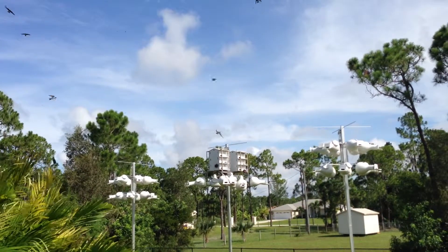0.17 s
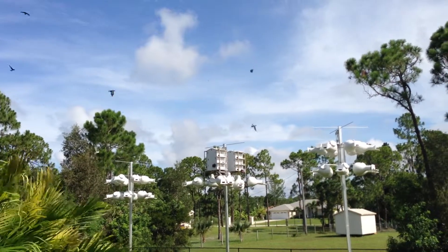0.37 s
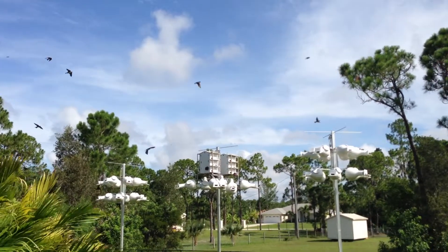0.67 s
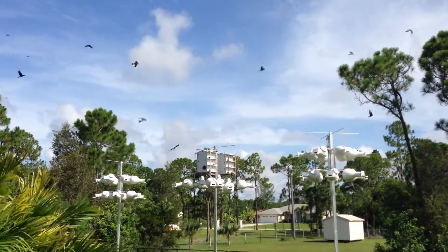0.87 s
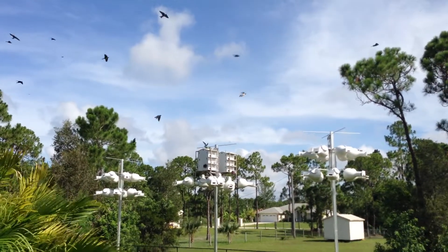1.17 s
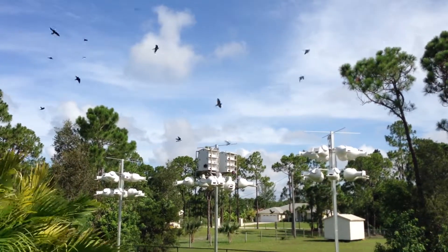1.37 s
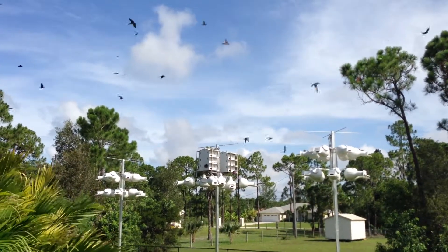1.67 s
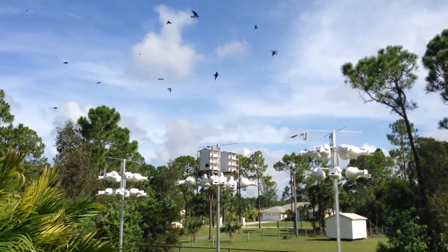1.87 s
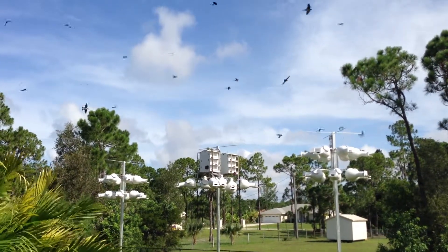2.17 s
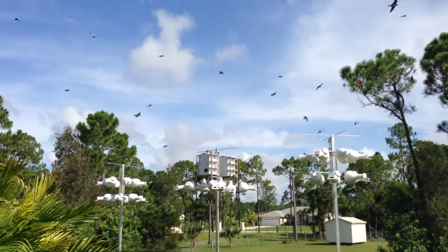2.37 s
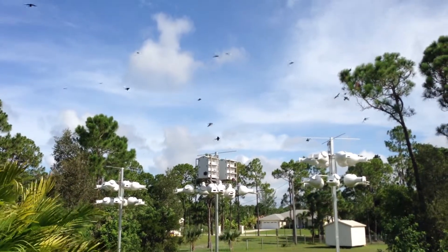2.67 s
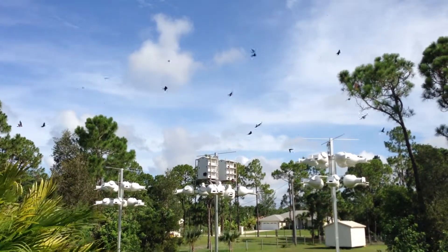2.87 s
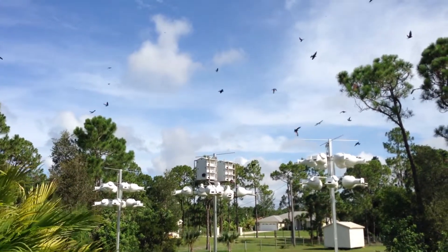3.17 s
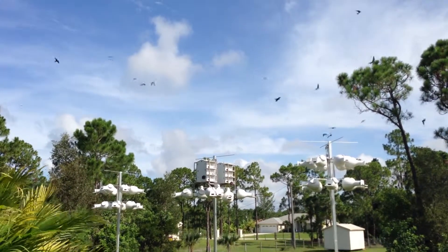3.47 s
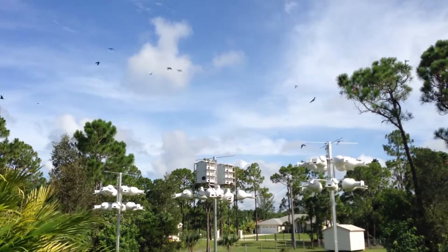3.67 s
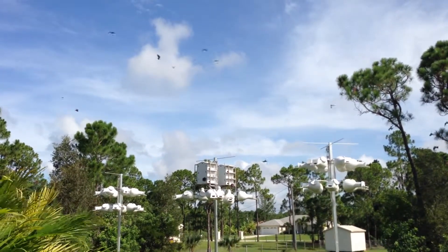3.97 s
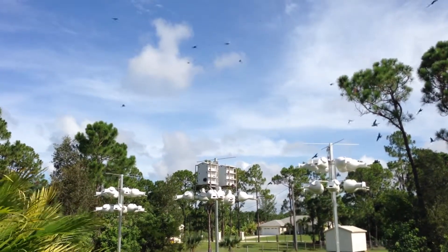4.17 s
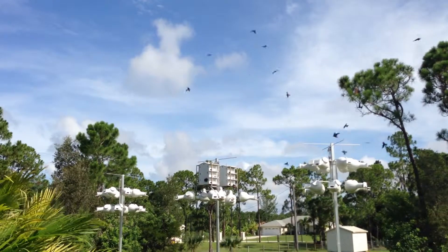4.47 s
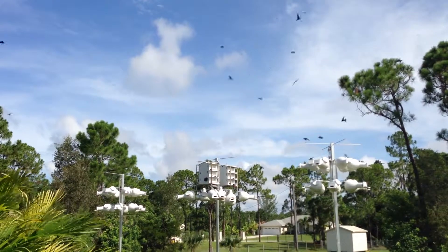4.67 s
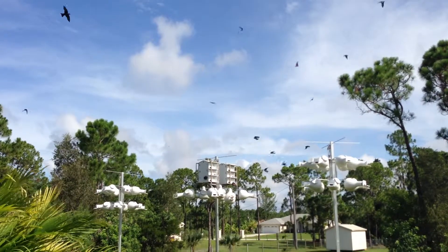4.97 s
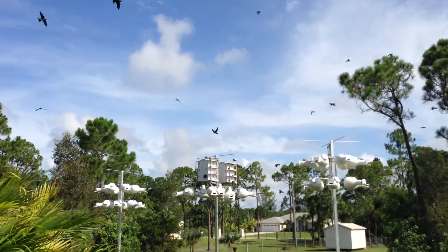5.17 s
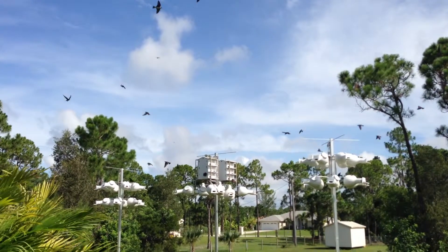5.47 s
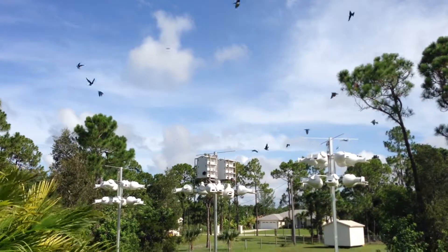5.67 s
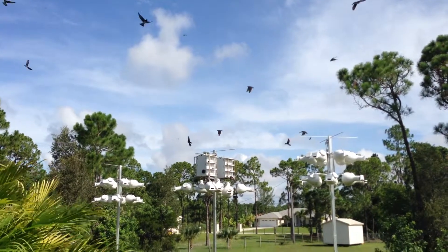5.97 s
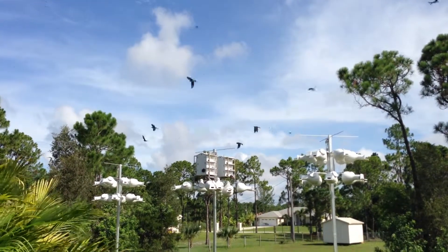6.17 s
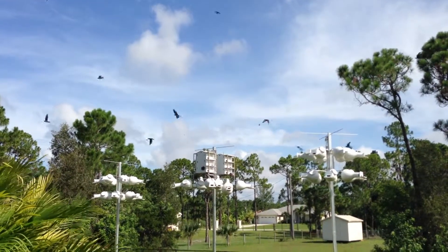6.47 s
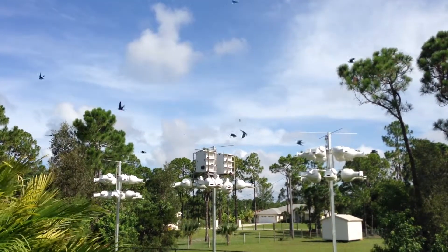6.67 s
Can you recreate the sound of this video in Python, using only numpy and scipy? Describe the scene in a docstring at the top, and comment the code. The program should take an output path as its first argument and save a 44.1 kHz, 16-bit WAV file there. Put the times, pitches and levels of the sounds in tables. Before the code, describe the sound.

Many small birds whistle and chatter outdoors with light echo, cicadas ringing thinly behind, wind thumping the microphone early, and a sudden raspy shriek.

```python
"""A colony of purple martins wheels over the nest houses in a backyard ringed by trees.
From the start their buzzy falling whistles overlap and echo, over shrill cicadas, steady hiss and a far drone.
Wind puffs (filtered noise) buffet the microphone hardest just after one second; quick sliding notes begin.
The cicadas, made of ringing harmonics, crest near two seconds and fade; then one bird gives a rough screech.
Chirps and slides go on, held notes come more often, and from four seconds there are bursts of tiny notes."""
import sys
import numpy as np
from scipy import signal
from scipy.fft import rfft, irfft, next_fast_len
from scipy.io import wavfile
from scipy.ndimage import uniform_filter1d, map_coordinates

SR = 44100
rng = np.random.default_rng(int(sys.argv[2]) if len(sys.argv) > 2 else 0)


def materialize(psi):
    """Save the field psi as 16-bit PCM at rate SR to the path in sys.argv[1].

    A 1-D psi becomes a single channel; in a 2-D psi each row is a channel.
    """
    bounded = np.clip(np.atleast_2d(psi).T, -1, 1)
    quanta = np.round(bounded * 32767).astype(np.int16)
    wavfile.write(sys.argv[1], SR, quanta)


N = 300762
TIME = np.arange(N) / SR
SWING_HZ = 220  # usual pitch swing of a chirp's buzz


def gain_of(db):
    """Turns decibels into amplitude."""
    return 10 ** (np.asarray(db) / 20)


def evened(x):
    """Scales a sound to an rms of 1."""
    return x / np.sqrt(np.mean(abs(x) ** 2) + 1e-20)


def read(points, hz):
    """Reads a curve of (Hz, value) points along log frequency."""
    f, value = np.transpose(points)
    return np.interp(np.log(hz + 1), np.log(f + 1), value)


def level_at(points, t):
    """Reads a curve of (seconds, value) points at the times t."""
    return np.interp(t, *np.transpose(points))


def add(mix, s, sound):
    """Mixes a sound in at time s, in seconds."""
    part = mix[max(round(s * SR), 0):][:len(sound)]
    part += sound[:len(part)]


def noise(colour):
    """Makes noise of rms 1 by shaping the spectrum of random samples."""
    size = next_fast_len(N)
    hz = np.fft.rfftfreq(size, 1 / SR)
    spectrum = rfft(rng.standard_normal(size)) * gain_of(read(colour, hz))
    return evened(irfft(spectrum, size)[:N])


def wander(rate, size):
    """Drifts smoothly between random values, with about rate new values a second."""
    knots = rng.standard_normal(4096)
    return map_coordinates(knots, [np.arange(size) * rate / SR], order=3, mode="wrap")


def fade(t, rise, fall):
    """Gives a note a soft start and end; rise and fall are in seconds."""
    start = np.sin(np.pi / 2 * np.clip(t / rise, 0, 1)) ** 2
    end = np.sin(np.pi / 2 * np.clip((t[-1] - t) / fall, 0, 1)) ** 2
    return start * end


def air():
    """Even outdoor hiss, plus a slowly swelling low drone like far road traffic."""
    # Spectrum of the hiss. Each row: frequency in Hz, relative level in dB per Hz.
    hiss_colour = [(15, -86), (400, -31), (1000, 0), (1800, -4.5), (3000, 5.5), (4500, -1), (7000, -6),
                   (10000, -10.5), (15300, -12.5)]
    # Spectrum of the drone. Each row: frequency in Hz, relative level in dB per Hz.
    drone_colour = [(15, -50), (25, -9), (60, -11), (100, 3.5), (170, -6), (350, 0), (550, -4.5), (900, -9),
                    (1400, -21), (2500, -33)]
    # Loudness of the drone over time. Each row: time in seconds, level in dB.
    drone_swell = [(0, -63), (1.8, -61.5), (2.4, -58), (3.2, -58.5), (3.8, -63), (4.4, -61.5), (5, -61),
                   (5.6, -59), (6.2, -58.5), (6.8, -60)]
    hiss = gain_of(-62.5) * noise(hiss_colour)
    drone = gain_of(level_at(drone_swell, TIME)) * noise(drone_colour)
    return hiss + drone


def wind(wake_db=-16, wake_s=0.024, bright_db=-30, dull_hz=330, lumpiness=0.74):
    """Weak eddies come at random with the breeze; each puff is a short low burst with a wake; strong ones reach higher."""
    # The breeze that carries the weak eddies. Each row: time in seconds, level in dB before the random spread.
    breeze = [(0, -48), (.55, -51.5), (.85, -53.5), (1.3, -53), (1.75, -69), (2.2, -63), (2.45, -56.5),
              (2.8, -63.5), (3.15, -64), (3.35, -81), (3.6, -59), (3.85, -81), (6.8, -78)]
    # The stronger puffs on the microphone. Each row: centre in seconds, level in dB, length in seconds.
    puffs = [(0.021, -33, 0.022), (0.16, -34.5, 0.063), (0.364, -41, 0.044), (.488, -44, 0.0075),
             (0.608, -39, 0.013), (.722, -34.5, 0.017), (.757, -40, 0.013), (0.898, -38, 0.0092),
             (0.962, -36, 0.0065), (1.101, -28, 0.013), (1.14, -31, 0.018), (1.173, -25, 0.014),
             (1.242, -31.5, 0.046), (1.355, -41.5, .012), (1.519, -45, .008), (1.655, -48.5, .018),
             (2.441, -43, 0.012), (2.63, -38.5, 0.046), (2.933, -46, 0.011), (2.983, -42.5, .03),
             (3.128, -44.5, 0.012), (3.574, -48.5, 0.041), (3.653, -40, 0.012), (3.683, -43.5, 0.0084),
             (4.941, -49, .013), (5.107, -40.5, .012), (5.138, -38, 0.012), (5.583, -40, 0.0077),
             (5.843, -45.5, 0.014)]
    # Spectrum of the turbulence. Each row: frequency in Hz, relative level in dB per Hz.
    swirl_colour = [(30, -23), (80, -38), (128, -5), (190, 0), (260, -2.5), (420, -7), (700, -18),
                    (1000, -35.5), (1400, -51), (2500, -100)]
    eddies_per_s, eddy_spread_db = 70, 5.5
    eddy_db = eddy_spread_db * np.minimum(wander(eddies_per_s, N), 1.5)
    power = gain_of(level_at(breeze, TIME) + eddy_db) ** 2
    for s, db, length in puffs:
        near = slice(max(int((s - .2) * SR), 0), int((s + .2) * SR))
        age = TIME[near] - s
        burst = np.exp(-np.pi * (age / length) ** 2)
        wake = gain_of(wake_db) ** 2 * np.exp(-(age / wake_s) ** 2)  # weaker, on both sides of the burst
        power[near] += gain_of(db) ** 2 * (burst + wake)
    force = np.sqrt(power)
    # the force of the eddy sets the loudness, so the swirl itself is kept fairly even
    swirl = noise(swirl_colour)
    swirl_power = uniform_filter1d(swirl ** 2, size=500) + 1e-3
    swirl = evened(swirl / swirl_power ** ((1 - np.clip(lumpiness, 0, 1)) / 2))
    low_pass = signal.butter(2, dull_hz, fs=SR, output="sos")
    dull = evened(signal.sosfiltfilt(low_pass, swirl))
    bright = force / (force + gain_of(bright_db) / 2)  # share of the full spectrum, 0 to 1
    return force * (bright * swirl + (1 - bright) * dull)


def insects(hiss_db=-63):
    """The cicadas' tymbals click so evenly that their bodies ring in thin high harmonics; farther ones blur to a hiss."""
    # Spectrum of the farther cicadas. Each row: frequency in Hz, relative level in dB per Hz.
    hiss_colour = [(4000, -12.5), (4900, -2), (5500, -7), (6300, -7), (7200, -5), (8000, -10.5),
                   (9000, -21.5)]
    # How their hiss swells. Each row: time in seconds, change in dB from hiss_db.
    hiss_swell = [(0, -1), (2, 0.5), (3.8, -9), (4.8, -25), (6.8, -18)]
    # Two distant cicadas, one curve each. Each row: time in seconds, tymbal pulses a second.
    pulse_rates = [
        [(0, 240.7), (2, 241.5), (4.2, 242.8), (6.8, 243)],
        [(.9, 238.7), (1.3, 238), (2.2, 235)],
    ]
    # Loudness of each of the two. Each row: time in seconds, level in dB added to that of every harmonic.
    cicada_swells = [
        [(0, -70.5), (1.2, -66), (2, -62.5), (3.2, -68), (4, -68.5), (4.5, -77), (6.8, -74.5)],
        [(0, -69.5), (.9, -71), (1.3, -67.5), (1.7, -80.5), (2.2, -105)],
    ]
    # How each body rings, one list each: relative level in dB of its harmonics, from the 20th up.
    body_rings = [
        [-5, -7, -7, -2, -8.5, -8, -22, -1, -20, -1, -7, -25, -8.5, -11],
        [-6.5, -1, -22, 4.5, -5, -2, -14, -7, -5, -8, -2, -8, -6, -7, -5],
    ]
    out = gain_of(hiss_db + level_at(hiss_swell, TIME)) * noise(hiss_colour)
    for rates, swell, body in zip(pulse_rates, cicada_swells, body_rings):
        pulses_per_s = level_at(rates, TIME) + 0.082 * wander(9, N)
        phase = 2 * np.pi * np.cumsum(pulses_per_s) / SR
        ring = np.zeros(N)
        for k, line_db in enumerate(body, 20):
            loudness = gain_of(line_db + 1.9 * wander(3.03, N))
            ring += loudness * np.sin(k * phase + 2 * np.pi * rng.random())
        out += gain_of(level_at(swell, TIME)) * ring
    return out


def syrinx(hz, second_db, third_db):
    """The bird's voice organ: a near-sine whistle with two overtones."""
    phase = 2 * np.pi * np.cumsum(hz) / SR
    second = gain_of(second_db) * np.sin(2 * phase)
    third = gain_of(third_db) * np.sin(3 * phase)
    return np.sqrt(2) * (np.sin(phase) + second + third)


def rest_pitch(start_hz):
    """The pitch in Hz a falling chirp sinks to, a little higher after a high start."""
    rest_hz, usual_start_hz, rest_follow = 2407, 3718, 0.3606
    return rest_hz * (start_hz / usual_start_hz) ** rest_follow


def chirp(length, start_hz, end_hz, bend, level_db, swell_db, swing_hz, buzz_hz=143, throb=0.27,
          jitter_hz=50, swing_growth=0.21, rise_follow=.45):
    """A falling whistle; a fast flutter of the syrinx shakes both its pitch and its loudness."""
    t = np.arange(max(int(length * SR), 64)) / SR
    u = t / t[-1]  # 0 at the start of the note, 1 at its end
    glide = start_hz * (end_hz / start_hz) ** (u ** bend)
    pace = rng.uniform(.87, 1.13) * (1 + .1 * wander(70, len(t)))
    flutter = 2 * np.pi * (np.cumsum(buzz_hz * pace) / SR + rng.random())
    swing = swing_hz * (1 + swing_growth * (u - .5)) * np.sin(flutter)
    hz = glide + swing + jitter_hz * wander(505.2, len(t))
    arch_db = 4 * (2 * u - 1) ** 2  # a chirp is fullest in its middle
    db = level_db + swell_db * (u - .5) - arch_db
    rise = np.interp(db[0], [-50, -40], [.024, .011]) * bend ** rise_follow  # soft and late-diving chirps swell in
    db = db + 1.42 * wander(50.0, len(t))  # the bird turns and beats its wings
    loudness = gain_of(db) * (1 + throb * np.cos(flutter)) * fade(t, rise, fall=0.021)
    return loudness * syrinx(hz, second_db=-29.5, third_db=-37.5)


def far_martins(level_db=-66, usual_hz=3800, count=60):
    """The rest of the colony, chirping at random far away and merging into a soft babble."""
    out = np.zeros(N)
    for k, (delay, size, loud) in enumerate(rng.random((count, 3)) - .5):
        hz = usual_hz * (1 + 0.15 * size)
        s = (k + 2 * delay) / count * N / SR
        add(out, s, chirp(0.17, hz, rest_pitch(hz), 1, level_db + 5 * loud, 0, SWING_HZ))
    return out


def rattles(ticks_per_s=230, tick_s=0.00944, low_hz=2450, high_hz=5000, drop=0.251, spread_db=14):
    """Scratchy chatter: a quick scatter of tiny falling whistles at random pitches."""
    # Each row: start in seconds, length in seconds, middle level in dB of one tick.
    chatter_bursts = [(4.124, 0.14, -59.5), (4.95, 0.06, -54.5), (5.31, 0.11, -57), (5.711, 0.07, -51.5),
                      (5.783, 0.064, -59)]
    out = np.zeros(N)
    t = np.arange(int(tick_s * SR)) / SR
    for s, length, db in chatter_bursts:
        count = max(int(length * ticks_per_s), 1)
        for k, (late, height, loud) in enumerate(rng.random((count, 3))):
            hz = low_hz * (high_hz / low_hz) ** height * np.exp(-drop * t / tick_s)
            tick = np.hanning(len(t)) * syrinx(hz, second_db=-14.5, third_db=-23.5)
            add(out, s + (k + late) / count * length, gain_of(db + spread_db * (loud - .5)) * tick)
    return out


def slurs(end_hz=1824):
    """Clean whistles that all slide down to about the same low pitch in a few hundredths of a second."""
    # Each row: start in seconds, length in seconds, start pitch in Hz, level in dB,
    # octave overtone in dB relative to the root.
    slur_notes = [(0.852, 0.05, 4240, -50.5, -14), (.92, 0.034, 2450, -57, -7),
                  (1.255, .05, 3050, -55.5, -0.5), (2.959, .052, 2700, -56.5, -14),
                  (3.016, .06, 2230, -65, -17), (4.081, 0.067, 4200, -55.5, -6.5),
                  (4.177, .03, 4100, -52.5, -22), (4.201, .034, 2890, -54.5, -25),
                  (4.237, 0.033, 2400, -60, -20), (4.928, 0.033, 3030, -54, 3), (4.956, .05, 2950, -57, -5),
                  (5.288, 0.066, 2990, -55, -7), (5.336, .058, 3600, -54, -18), (5.488, .07, 2650, -63, -3),
                  (5.732, 0.045, 3730, -52.5, -6), (5.79, 0.028, 2350, -60, 0),
                  (5.83, 0.036, 2770, -65, -4)]
    out = np.zeros(N)
    for s, length, start_hz, db, octave_db in slur_notes:
        t = np.arange(int(length * SR)) / SR
        glide = start_hz * (end_hz / start_hz) ** ((t / t[-1]) ** .85)
        hz = glide * (1 + 0.0081 * wander(170.0, len(t)))
        loudness = gain_of(db) * fade(t, rise=0.0058, fall=0.02)
        add(out, s, loudness * syrinx(hz, octave_db, octave_db - 12.5))
    return out


def screech(rasp_hz=650, overtone_rasp_hz=430, third_db=-13, hiss_db=-20):
    """A loud high whistle that dives and breaks into a rasp; its overtones are rougher than its root."""
    # The screech and a low note under its end, one curve a note. Each row: time in seconds, pitch in Hz,
    # level in dB, roughness from 0 to 1, octave overtone in dB relative to the root.
    screech_notes = [
        [(2.657, 2670, -39.5, 0.4, -9), (2.668, 3470, -39.5, 0.3, -9), (2.684, 3780, -38, 0.3, -8)],
        [(2.676, 5350, -42, 0, -22), (2.694, 5540, -32, 0.03, -21), (2.711, 5040, -34.5, 0.2, -15.5),
         (2.725, 4200, -30, 0.35, -17.5), (2.74, 3740, -30, 0.39, -18.5), (2.758, 3560, -39, 0.32, -10.5),
         (2.787, 4290, -43, 0.84, -15), (2.812, 4120, -58, 0.47, 0.5), (2.835, 3430, -43.5, 0.32, 6)],
        [(2.828, 4950, -35, 0.55, -26), (2.86, 5000, -47, 0.53, -28), (2.92, 5120, -66, 0, -22)],
        [(2.74, 2755, -61, 0.18, -26), (2.805, 2706, -43.5, 0.19, -26), (2.84, 2490, -54, 0.3, -26)],
    ]
    out = np.zeros(N)
    hiss = noise([(1500, -47), (2300, -1), (5200, 0), (6100, -10), (8000, -6), (12000, -15), (15000, -26)])
    for note in screech_notes:
        s, *columns = np.transpose(note)
        t = np.arange(s[0], s[-1], 1 / SR)
        hz, db, rough, octave_db = (np.interp(t, s, c) for c in columns)
        rasp = rasp_hz * rough * wander(1300, len(t))  # random pitch shake
        phase = 2 * np.pi * np.cumsum(hz + rasp) / SR
        shake = 2 * np.pi * np.cumsum(overtone_rasp_hz * wander(1800, len(t))) / SR
        overtones = np.sin(2 * phase + shake) + gain_of(third_db) * np.sin(3 * phase + 2 * shake)
        voice = np.sqrt(2) * (np.sin(phase) + gain_of(octave_db) * overtones)
        voice = voice + gain_of(hiss_db) * hiss[(t * SR).astype(int)]
        add(out, s[0], gain_of(db) * fade(t - t[0], rise=0.0013, fall=0.003) * voice)
    return out


def martins(level_db=-1, held_swell_db=3, held_swing_hz=165, swing_follow=0.13, held_sag=.07):
    """The falling chirps and held notes of the nearer birds; a chirp that dives early has a narrower buzz."""
    # Buzzy falling chirps. Each row: start in seconds, length in seconds, start pitch in Hz,
    # bend (under 1 dives early, over 1 late), level in dB before level_db, swell from start to end in dB.
    falling_chirps = [(0, 0.12, 3400, 0.8, -43, -14), (0.074, 0.19, 3625, 1.45, -50, -14),
                      (0.159, 0.18, 3300, 0.78, -44, -9), (0.539, 0.17, 3330, 0.78, -41.0, -5),
                      (0.569, 0.17, 3537, 1.52, -43, -9), (1.006, 0.14, 4120, 0.61, -37, -3),
                      (1.179, 0.14, 3422, 1.37, -36.5, 4), (1.303, 0.17, 3850, 0.71, -42.5, -1),
                      (1.378, 0.15, 4023, 4.1, -39, -4), (1.393, 0.17, 3675, 0.98, -41.5, -7),
                      (1.874, 0.15, 3307, 3.05, -40, 3), (2.028, 0.14, 4270, 0.73, -42.5, -6.5),
                      (2.135, 0.14, 3676, 0.73, -41.5, -5), (2.252, 0.19, 3990, 0.5, -41.5, 4),
                      (2.301, 0.16, 4083, 0.7, -41, -6.5), (2.583, 0.16, 3350, 2.57, -40, 3),
                      (2.861, 0.166, 3026, 1.59, -48, -11), (2.978, 0.19, 4345, 0.51, -42.0, -10),
                      (3.089, 0.15, 3920, 0.8, -44, 0), (3.327, 0.14, 4075, 0.85, -43.5, -3),
                      (3.457, 0.19, 4220, 0.72, -45, -17), (3.539, 0.12, 3386, 2.07, -45.5, -14),
                      (3.604, 0.17, 3905, 0.59, -43, -11.5), (3.665, 0.2, 4000, 0.64, -45, -2),
                      (3.897, 0.163, 4016, 0.96, -43, 2), (3.92, 0.169, 4010, 1.08, -41.5, -1),
                      (4.312, 0.16, 3573, 1.2, -44, 1), (4.587, 0.13, 3716, 0.9, -44.5, -5),
                      (4.752, 0.145, 3326, 1.32, -44, -10), (4.942, 0.2, 3456, 2.35, -44, 1),
                      (5.019, 0.16, 3430, 1.43, -42.5, -19), (5.079, 0.16, 4020, 0.59, -45, -3),
                      (5.249, 0.13, 3523, 1.87, -45.0, -14), (5.36, 0.16, 3190, 1.35, -48.5, 6),
                      (5.452, 0.17, 3094, 1.29, -47.5, -4.5), (5.594, 0.18, 3720, 1, -43, 1),
                      (5.886, 0.12, 3540, 1.76, -52, -28), (5.975, 0.17, 3450, 1.24, -50.5, -5),
                      (6.181, 0.12, 4190, 0.72, -42.5, -3), (6.398, 0.15, 3990, 0.89, -45.5, 8.5),
                      (6.44, 0.2, 3770, 2.1, -50, 1), (6.596, 0.13, 4323, 0.58, -37.5, -6),
                      (6.684, 0.14, 3430, 0.45, -46, -16)]
    # Notes that hardly sag. Each row: start in seconds, length in seconds, pitch in Hz,
    # level in dB before level_db.
    held_notes = [(3.485, 0.09, 3400, -37.5), (3.766, 0.112, 3655, -41.5), (4.522, 0.11, 4040, -38),
                  (5.281, 0.11, 3898, -35.5), (5.905, 0.097, 3328, -44), (6.147, 0.063, 4240, -38)]
    out = np.zeros(N)
    for s, length, hz, bend, db, swell_db in falling_chirps:
        swing_hz = SWING_HZ * bend ** swing_follow
        add(out, s, chirp(length, hz, rest_pitch(hz), bend, db, swell_db, swing_hz))
    for s, length, hz, db in held_notes:
        end_hz = hz * (1 - held_sag)
        add(out, s, chirp(length, hz, end_hz, 1, db, held_swell_db, held_swing_hz))
    return gain_of(level_db) * out


def yard(x, early_db, tail_db, early_t60=0.029):
    """Echoes a sound: scatter from nest houses and ground, then a tail from the trees."""
    # How long the tail rings. Each row: frequency in Hz, seconds to fall by 60 dB.
    tail_t60 = [(500, 0.83), (3000, 0.39), (6000, 0.52), (12000, 0.34)]
    # sparse random clicks: about 300 early and 2500 tail reflections a second
    signs = rng.choice([-1., 1.], (2, SR))
    taps = signs * (rng.random((2, SR)) < [[300 / SR], [2500 / SR]])
    age = np.arange(SR) / SR
    early = taps[0] * gain_of(-60 * age / early_t60) * (age > .002)
    # each pitch band of the tail dies away at its own speed
    hz, t, bands = signal.stft(taps[1] * np.clip(age / 0.009, 0, 1), SR, nperseg=256)
    decay = gain_of(-60 * t / read(tail_t60, hz)[:, None])
    tail = signal.istft(bands * decay, SR, nperseg=256)[1][:SR]
    early_echo = gain_of(early_db) * early / np.linalg.norm(early)
    tail_echo = gain_of(tail_db) * tail / np.linalg.norm(tail)
    return x + signal.fftconvolve(x, early_echo + tail_echo)[:N]


def scene():
    """Birds, each group with its own amount of yard echo, over insects, air and wind."""
    distant = yard(rattles() + far_martins(), early_db=0, tail_db=-3.0)
    sliding = yard(slurs(), early_db=-9.5, tail_db=-6)
    screeching = yard(screech(), early_db=-1, tail_db=-4.0, early_t60=0.28)
    flying = yard(martins(), early_db=-6.0, tail_db=-8)
    background = air() + wind() + insects()
    return (background + distant + sliding + screeching + flying)[None]


def record(dry):
    """The recorder's low cut and band limit."""
    low_cut = signal.butter(2, 55, "highpass", fs=SR, output="sos")
    thinned = signal.sosfilt(low_cut, dry)
    band_limit = signal.firwin(511, 15400, window=("kaiser", 9), fs=SR)
    return signal.oaconvolve(thinned, band_limit[None], "same")


dry = scene()
out = record(dry)
materialize(out)
```